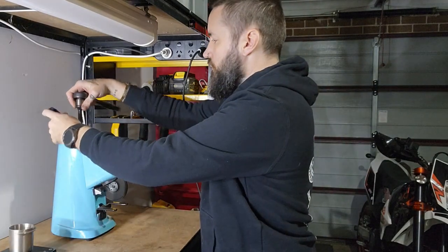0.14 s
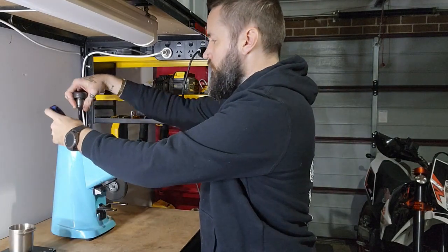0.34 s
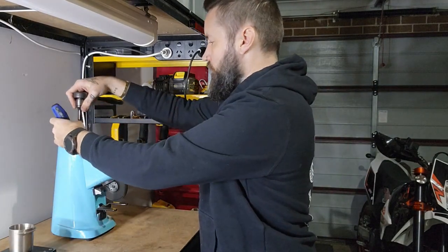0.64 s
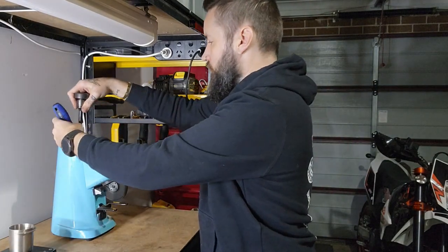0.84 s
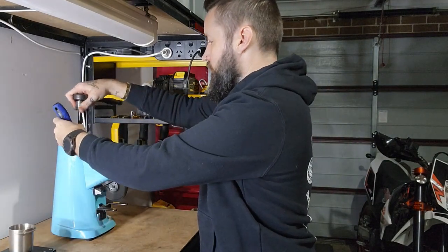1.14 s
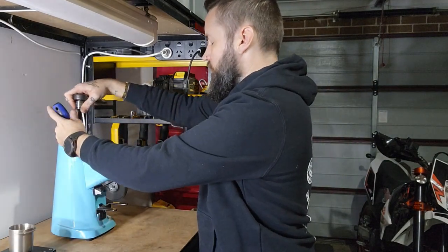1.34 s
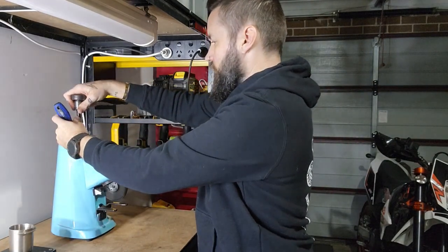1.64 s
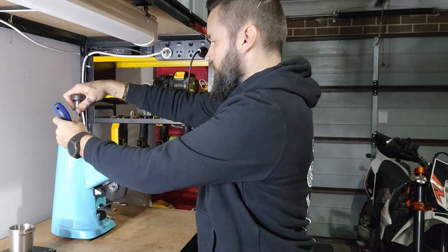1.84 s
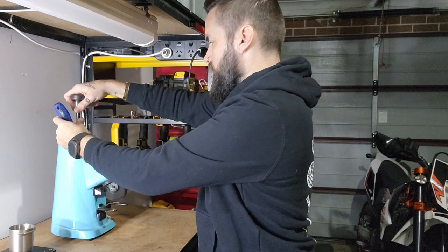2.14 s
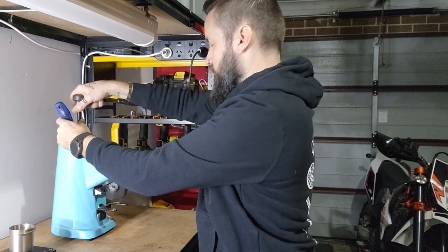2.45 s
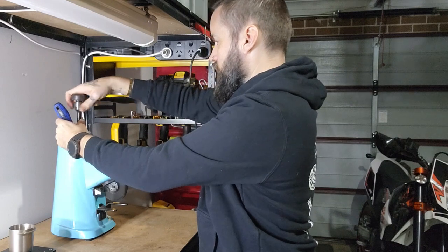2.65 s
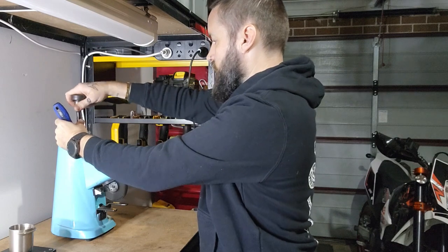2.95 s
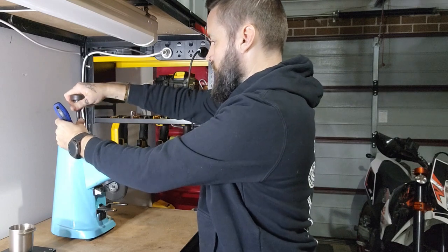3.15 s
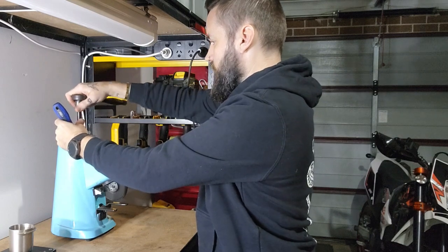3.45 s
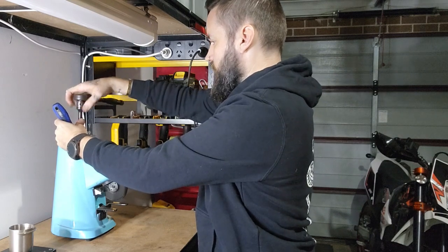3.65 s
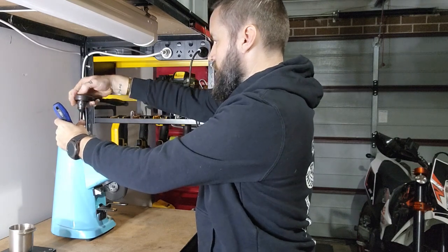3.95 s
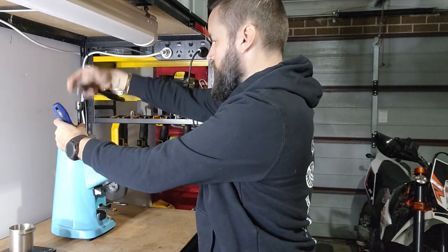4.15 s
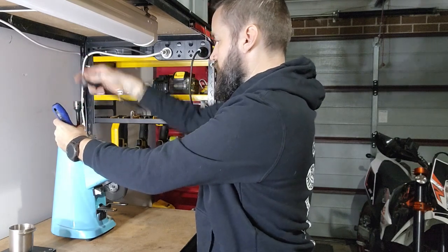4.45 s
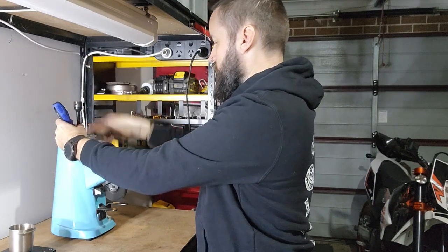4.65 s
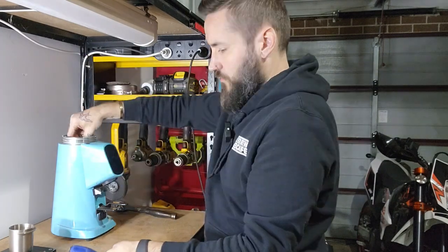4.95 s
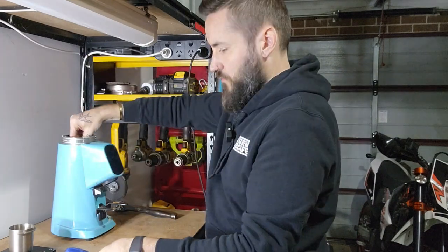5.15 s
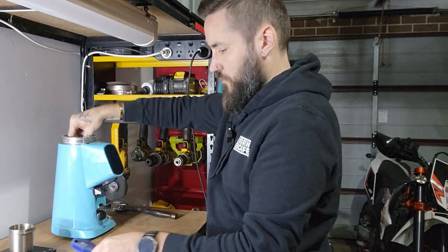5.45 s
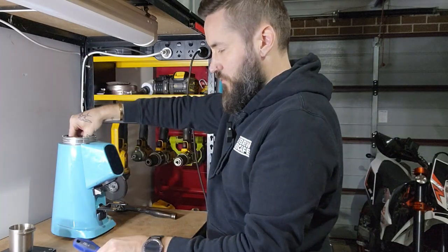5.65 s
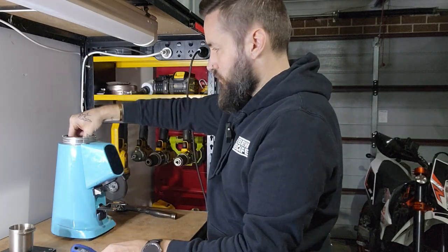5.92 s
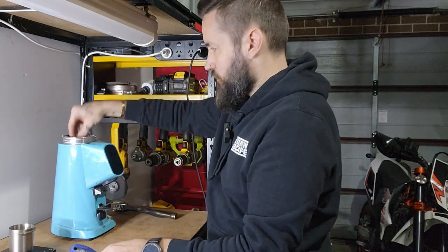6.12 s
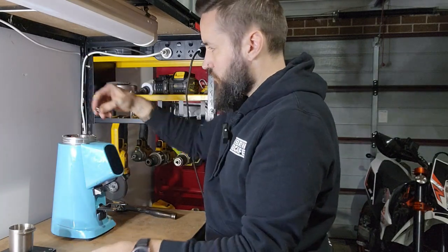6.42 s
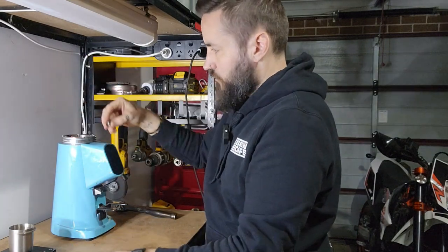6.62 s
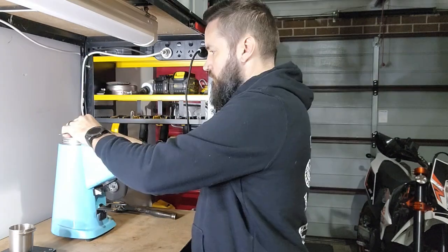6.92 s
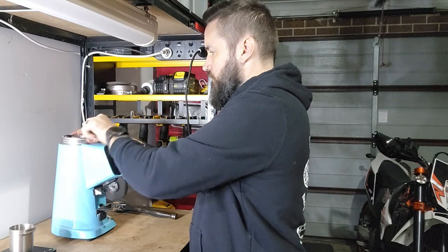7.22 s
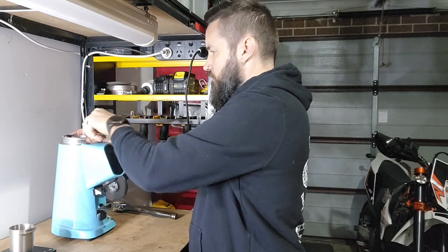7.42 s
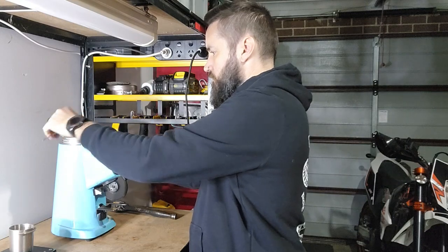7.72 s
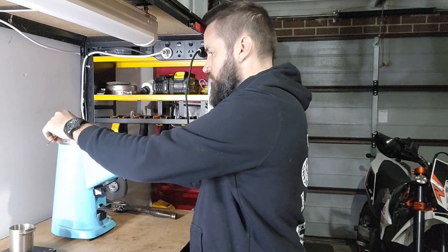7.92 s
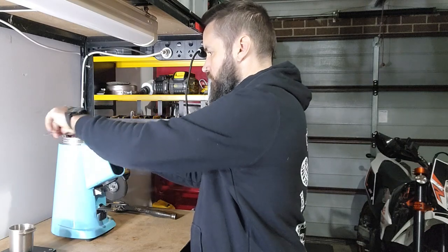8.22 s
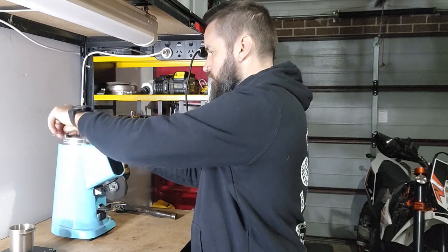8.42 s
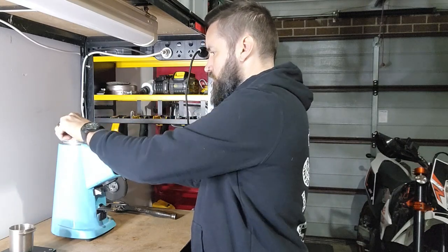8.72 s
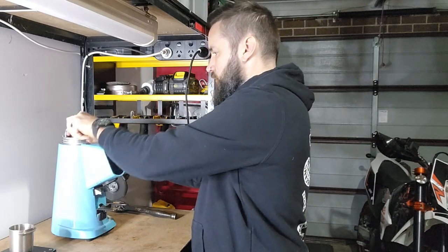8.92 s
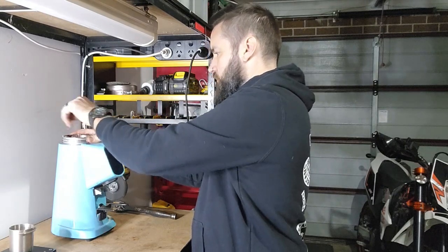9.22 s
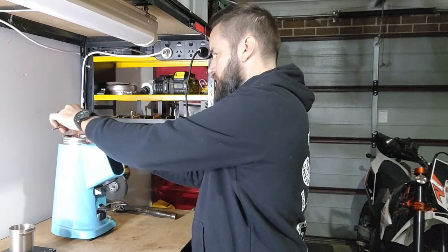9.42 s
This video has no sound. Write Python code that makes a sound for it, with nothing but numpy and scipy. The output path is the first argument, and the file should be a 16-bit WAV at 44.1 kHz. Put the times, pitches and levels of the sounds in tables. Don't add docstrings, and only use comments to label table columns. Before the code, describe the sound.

In a garage, a hand ratchet ticks and knocks on a hollow metal grinder, snaps a few hard clicks, pauses, then rattles off two fast bursts. The socket wobbles loose with faint ticks. A heavy part thuds twice, and a loose metal carrier snaps and clacks at uneven intervals. Sleeves and hands rub softly. Close microphone, short hard-walled room echo.

```python
import sys
import numpy as np
from scipy import signal
from scipy.fft import rfft, irfft, next_fast_len
from scipy.io import wavfile
from scipy.ndimage import uniform_filter1d, map_coordinates

SR = 44100
rng = np.random.default_rng(int(sys.argv[2]) if len(sys.argv) > 2 else 0)


def transcribe(signal):
    frames = np.atleast_2d(signal).T
    limited = np.clip(frames, -1, 1)
    pcm = np.round(limited * 32767).astype(np.int16)
    wavfile.write(sys.argv[1], SR, pcm)


def decibels_to_gain(level_db):
    exponent = np.asarray(level_db, float) / 20
    return 10 ** exponent


N = 422037

# (time [s], peak [dB], strongest ring [Hz], treble [dB], jolt into the housing [dB])
STROKES = [(0.9199, -2, 3473, -10.5, -13), (0.9607, 1, 2512, -11.5, -31), (0.9743, -2, 3358, -13, -12),
           (0.9963, -0.5, 6300, -14, -10.5), (1.0553, -2.5, 3500, -12.5, -28.5),
           (2.5547, -2.5, 4250, -20.5, -29.5), (2.729, -2.5, 4700, -10, -14.5), (2.796, -2, 4784, -13, -23),
           (2.8416, -1, 3830, -12.5, -20), (2.8935, -2, 4273, -12.5, -21), (2.9446, -1, 3260, -14.5, -13.5),
           (2.964, -1.5, 3300, -18, -34), (2.9736, -1.5, 3260, -16.5, -41.5), (2.9843, -2, 3660, -16, -16),
           (3.011, -3, 4186, -17.5, -35.5), (3.04, -1.5, 4304, -17, -27), (3.0706, -5.5, 3672, -16, -21),
           (3.0833, 0, 3686, -15.5, -39), (3.1152, -1.5, 4250, -16.5, -27),
           (3.437, -5.5, 3447, -13.5, -29.5), (3.4465, 3, 3825, -17.5, -37),
           (3.456, -2.5, 3272, -14, -29.5), (3.476, -2.5, 3290, -15.5, -29), (3.49, 0.5, 3263, -10.5, -22),
           (3.5023, -4, 3334, -11, -32), (3.5271, -3.5, 3322, -13, -24.5),
           (3.5547, -3.5, 3290, -14.5, -27.5), (3.627, -12.5, 3528, -10.5, -19)]
# (time [s], peak [dB], strongest ring [Hz], treble [dB])
TICKS = [(0.0447, -17.5, 2830, -17.5), (0.141, -11, 2880, -19.5), (.2308, -51, 2400, -35),
         (0.308, -31.5, 4630, -38), (0.361, -39.5, 2300, -46), (.797, -19, 4720, -35.5),
         (0.8252, -15.5, 2270, -70.5), (1.4287, -42, 2000, -38), (1.5266, -25.5, 4370, -16.5),
         (1.8513, -36.5, 3290, -51.5), (2.323, -25.5, 2930, -72), (2.3994, -37, 2530, -47),
         (2.548, -38, 4300, -13.5), (.167, -45, 3500, -30), (3.868, -45.5, 2970, -45),
         (1.306, -55, 3020, -37), (0.371, -45, 4430, -27.5), (1.497, -44.5, 3380, -37),
         (1.612, -51, 2300, -28), (1.659, -48.5, 3990, -30), (1.803, -61, 3320, -43.5)]
# (time [s], peak [dB], strongest ring [Hz], treble [dB], knock [dB])
SOCKET = [(3.9025, -22, 3220, -17, -36.5), (4.1087, -34, 4570, -21, -35.5), (4.13, -36, 4360, -33, -22.5),
          (4.1476, -29.5, 2400, -42, -29), (4.282, -42, 3480, -29, -43), (4.2955, -40.5, 3660, -38, -37.5),
          (4.383, -44.5, 3750, -41.5, -62), (4.487, -41, 3150, -30, -25.5),
          (4.5206, -24.5, 2500, -24, -23.5), (4.5603, -25, 4900, -27.5, -27.5),
          (4.593, -37, 2180, -37, -21), (4.6346, -25.5, 2310, -68, -33.5), (4.6435, -29, 2850, -53, -30.5),
          (4.741, -45, 3030, -36, -31.5), (4.9332, -30.5, 2070, -20, -29.5),
          (4.9972, -29.5, 4440, -9, -57.5), (5.046, -34, 2180, -2, -46.5)]
# (time [s], peak [dB], strongest ring [Hz], treble [dB], ring [dB])
SNAPS = [(5.23, -42, 2250, -0.5, -28), (5.271, -41, 2960, -19, -19), (5.358, -48, 2400, 0, -17),
         (5.3855, -43, 2200, 2, -11), (5.438, -27, 1293, -32, 11), (5.4408, -35, 2000, -25, 15),
         (5.4984, -39.5, 2050, -7, -12), (5.841, -21.5, 1800, -21.5, -10.5), (6.667, -14.5, 1068, -40.5, 3),
         (6.6674, -2, 4130, -13.5, -2.5), (7.047, 0, 5110, -25, 0), (7.4747, -36, 6700, -14.5, -1.5),
         (7.88, -45.5, 3530, -26.5, 0), (7.962, -26, 4030, -5.5, 10), (7.9706, -22, 3660, -11, 3.5),
         (8.2647, -21.5, 3220, -32, -3), (8.709, -5, 3975, -13, 7.5), (8.8324, 0.5, 3880, -23.5, 4),
         (9.5603, -21, 3820, -2, 7)]
# (pitch [Hz], width [Hz], level [dB])
PAWL = [(2366, 92, 0), (3260, 110, 0.5), (3617, 94, -5), (4180, 70, -2.5), (4720, 130, -6.5),
        (4960, 33, -11), (6430, 47, -15.5), (9180, 230, -7), (11730, 270, -11)]
SEAT = [(2500, 67, -16.5), (2970, 280, -24.5), (3880, 520, -20.5), (4630, 45, -20), (6300, 410, -4.5),
        (6860, 90, -8.5), (11600, 600, -9)]
# (frequency [Hz], level [dB per Hz])
PAWL_CRACK = [(410, -29), (700, -10.5), (1770, -7), (3380, -1.5), (6540, -4), (7460, -12.5), (11200, -19.5),
              (15200, -32), (16500, -39)]
SEAT_CRACK = [(290, -38.5), (500, -8), (1980, -3), (4290, 0.5), (7900, -9.5), (9300, -24.5), (11800, -18.5),
              (15100, -31), (16500, -38.5)]
# (pitch [Hz], level [dB], time to fall 60 dB [s])
FREE_HANDLE = [(2400, -1.5, 0.22), (3400, 12.5, 0.24), (3180, 4.5, 0.22), (5300, -4, .2), (6300, 1.5, 0.18),
               (7060, -3, .25), (8700, -4.5, .2)]
HANDLE = [(2480, -7.5, 0.12), (3290, 11, 0.085), (3660, -1, 0.17), (4250, -5, 0.06), (6600, -6, 0.081)]
HEAD = [(2950, 2.5, 0.18), (4570, 3.5, 0.11), (5100, -1.5, .15), (7360, -3, 0.077), (9000, -6.5, 0.074)]
BURR = [(4090, -0.5, 0.4), (4470, -11.5, 0.22), (3800, -3.5, .2), (3448, -8.5, 0.16), (6600, -8.5, 0.48),
        (7300, -7, .2), (11500, -10, 0.19), (12300, -9, 0.27)]
# (time [s], shell [dB], collar [dB])
KNOCKS = [(.047, 2.5, -7), (0.145, -10, -18), (0.276, -40, -54), (0.3, -19, -51), (.311, -13, -53),
          (.319, -8.5, -26), (0.335, -29, -25), (.421, -44, -49), (.605, -25, -41), (.611, -14.5, -35),
          (.621, -14, -36), (.63, -20.5, -37.5), (.684, -24, -36.5), (.745, -22.5, -44.5),
          (0.756, -25.5, -45), (.79, -14, -40.5), (.812, -17.5, -35.5), (0.667, -24, -34),
          (.733, -28.5, -46), (.784, -16, -34), (.798, -11, -26), (0.83, -12, -23), (.842, -24.5, -29),
          (1.312, -32.5, -40), (1.461, -32, -35.5), (1.499, -16, -47), (1.525, -27, -20.5),
          (1.612, -27.5, -38), (1.85, -37, -36.5), (2.326, -2, -11.5), (2.522, -29.5, -37.5),
          (3.339, -25, -35), (3.66, -29, -54), (0.976, -11.5, -11.5), (2.799, -30.5, -7),
          (4.486, -46.5, -30.5), (4.593, -44, -22), (.235, -43, -47), (.284, -24, -38),
          (.545, -43.5, -60.5), (1.802, -46, -42), (4.268, -39.5, -55), (4.285, -40, -44),
          (4.315, -34, -41), (4.441, -41.5, -50), (4.779, -36, -63), (4.912, -44, -45), (5.104, -55.5, -45),
          (5.164, -45, -37.5)]
# (time [s], shell [dB], bench [dB], collar [dB])
ROCKS = [
    (1.505, -31, -21, -46),
    (3.34, -37.5, -25.5, -39.5),
    (3.635, -27, -22, -39),
    (3.673, -40, -33.5, -44),
    (4.111, -43, -28, -48),
]
# (time [s], shell [dB], bench [dB], chamber [dB])
OPEN_KNOCKS = [(5.229, 5, -10, -3), (5.842, -1.5, -16.5, -14), (5.438, -21.5, -45.5, -40),
               (5.492, -25.5, -32.5, -25.5), (6.625, -65.5, -38.5, -51.5), (6.665, -31.5, -20.5, -20.5),
               (7.045, -36, -11.5, -11.5), (7.411, -49.5, -37, -36.5), (7.474, -43, -32.5, -38.5),
               (7.733, -43.5, -51.5, -72.5), (7.887, -44, -45, -66), (7.94, -34, -53, -62.5),
               (7.965, -26, -35.5, -34), (8.214, -34, -49.5, -60), (8.264, -27.5, -30.5, -54.5),
               (8.506, -17.5, -58, -39.5), (8.551, -50.5, -30, -44.5), (8.607, -22, -61, -60),
               (8.709, -47.5, -26.5, -22.5), (8.81, -20, -49, -49.5), (8.832, -40, -18.5, -13.5),
               (9.09, -25.5, -36.5, -45.5), (5.238, -7.5, -28.5, -4.5), (5.248, 2.5, -30, -20.5),
               (5.258, -11.5, -26.5, -26.5), (5.281, -12, -29, -26), (5.505, -49.5, -45.5, -32),
               (5.522, -49.5, -54.5, -40.5), (5.592, -38, -55, -41), (5.612, -35, -48.5, -40.5),
               (5.69, -41.5, -52.5, -46), (5.763, -47.5, -50.5, -39), (5.797, -33.5, -45.5, -36.5),
               (5.858, -6.5, -20, -15)]
# (pitch [Hz], width [Hz], level [dB])
SHELL = [(573, 37, 7), (526, 120, -8), (652, 9.3, 0)]
BENCH = [(100, 15, -11), (161, 34, 8), (330, 120, 0.5), (403, 5.7, -6)]
COLLAR = [(1183, 83, 4.5), (1390, 22, -13)]
OPEN_SHELL = [(530, 26, 5.5), (710, 150, -21.5)]
OPEN_BENCH = [(126, 21, 3), (153.6, 6.2, 10), (238, 98, -4)]
CHAMBER = [(391.7, 14, 3.5), (287, 30, -4.5)]
# (time [s], peak [dB], time to fall 60 dB [s])
THUDS = [
    (5.228, 0, 0.044),
    (5.839, -1.5, 0.19),
]
# (time [s], peak [dB], time to fall 60 dB [s])
TAP = [
    (6.349, -26, 0.028),
]
# (frequency [Hz], level [dB per Hz])
LANDING = [(35, -52), (60, -19.5), (260, -6.5), (404, -6.5), (520, -2.5), (683, -13), (955, -11.5),
           (1450, -22), (2200, -35), (9000, -60.5), (11700, -83), (19800, -120)]
FINGER = [(60, -30), (200, 3), (900, 0.5), (2000, -12.5), (2700, -22), (15000, -49)]
# (start [s], end [s], pitch [Hz], width [Hz],
# level [dB])
SCRAPES = [(7.22, 7.46, 153, 410, -48), (4.109, 4.174, 1214, 62, -40), (4.107, 4.169, 1540, 3000, -42.5),
           (4.503, 4.543, 840, 2000, -39.5), (4.48, 4.66, 860, 690, -50.5), (.64, .85, 330, 130, -40.5),
           (4.627, 4.654, 1100, 2600, -43), (5.417, 5.525, 1200, 1300, -46.5),
           (4.93, 4.965, 1248, 110, -43.5), (5.043, 5.075, 1290, 59, -44.5), (5.1, 5.2, 1200, 170, -59.5),
           (5.082, 5.197, 2200, 330, -55.5), (6.378, 6.528, 110, 410, -57.5),
           (5.75, 5.838, 780, 400, -55.5), (5.47, 5.54, 340, 300, -36.5), (5.56, 5.63, 465, 610, -47),
           (5.68, 5.838, 240, 550, -44.5), (4.48, 4.505, 3500, 170, -59), (4.26, 4.33, 560, 180, -47.5),
           (.07, .13, 4600, 250, -56), (.29, .34, 4620, 300, -54), (.44, .54, 4550, 280, -64),
           (.62, .71, 4600, 260, -64), (.77, .79, 4550, 250, -57), (.15, .22, 7450, 250, -61),
           (.3, .4, 7450, 260, -66), (.61, .67, 7450, 260, -65), (.42, .51, 600, 150, -45),
           (.31, .44, 1170, 90, -45), (.61, .72, 540, 250, -44), (3.63, 3.7, 1150, 300, -45),
           (3.64, 3.71, 3000, 900, -51)]
# (time [s], effort [dB])
HANDS = [(0, -40), (.59, -59.5), (.88, -49), (1.17, -55), (2.16, -68.5), (2.96, -46), (3.221, -61),
         (3.57, -53), (3.92, -62.5), (5.22, -55.5), (5.4, -43.5), (5.639, -59), (5.818, -38.5),
         (6.16, -75.5), (7.202, -54), (7.65, -87.5), (8.87, -45), (9.17, -60.5)]
# (frequency [Hz], level [dB per Hz])
RUMBLE = [(18, -63), (30, -23.5), (45, -22), (65, 5), (108, -14.5), (160, -3), (450, -34.5), (580, -63.5),
          (990, -120)]
RUSTLE = [(820, -30), (1400, -7), (1990, -6.5), (4050, -8.5), (10100, -19), (15200, -47), (16000, -29.5),
          (16500, -51)]
# (start [s], end [s], pitch [Hz], width [Hz], level [dB])
SLEEVES = [(0.26, 0.36, 5600, 9000, -55), (0.578, 0.75, 4630, 8640, -53), (1.42, 1.7, 2500, 5556, -49.5),
           (3.76, 3.82, 9300, 6040, -58), (8.47, 8.66, 5980, 9000, -61.5), (5.62, 5.84, 5000, 8000, -57),
           (3.28, 3.43, 3700, 7025, -65), (4.088, 4.216, 2500, 4000, -54.5),
           (4.463, 4.7, 2500, 4000, -52.5), (4.905, 5.065, 2500, 4000, -59), (5.297, 5.56, 9000, 6900, -74)]
# (frequency [Hz], time to fall 60 dB [s])
GARAGE = [(100, 0.63), (500, 0.33), (2000, .43), (5000, 0.34), (8000, 0.27), (13000, 0.2), (16000, .15)]
# (frequency [Hz], level [dB per Hz])
AIR = [(15, -36.5), (25, -8), (80, -1.5), (433, -16), (553, -15), (1980, -26), (3510, -22.5), (6730, -26.5),
       (8140, -41.5), (15200, -43.5), (16500, -54)]


def unit(x):
    return x / np.sqrt(np.mean(x ** 2) + 1e-20)


def along(points, hz):
    f, v = np.transpose(points)
    return np.interp(np.log(hz + 1), np.log(f + 1), v)


def filtered(x, response):
    size = next_fast_len(len(x) + min(len(x) // 2, 8192))
    hz = np.fft.rfftfreq(size, 1 / SR)
    return irfft(rfft(x, size) * response(hz), size)[:len(x)]


def resonant(modes):
    def response(f):
        return sum((-1) ** k * decibels_to_gain(db) * 1j * f * w / (c * c - f * f + 1j * f * w)
                   for k, (c, w, db) in enumerate(modes))
    return response


def coloured(spectrum, size):
    return unit(filtered(rng.standard_normal(size), lambda hz: decibels_to_gain(along(spectrum, hz))))


def even(x):
    z = rfft(x, 2 * len(x))
    power = uniform_filter1d(np.abs(z) ** 2, size=80)
    return irfft(z / np.sqrt(np.abs(power) + 1e-12))[:len(x)]


def even_burst(raw, spectrum):
    return unit(filtered(even(raw), lambda hz: decibels_to_gain(along(spectrum, hz)))) * raw.std()


def lumpy_run(size, hz, width, lumps_db, hold):
    lumps = np.repeat(rng.standard_normal(size // hold + 1), hold)[:size]
    slips = rng.standard_normal(size) * decibels_to_gain(lumps_db * lumps)
    return unit(filtered(slips, lambda f: resonant([(hz, width, 0)])(f) ** 2))


def add(track, s, x):
    part = track[round(s * SR):][:len(x)]
    part += x[:len(part)]


def ratchet_contacts():
    loaded = [(s, db, hz, treble_db, -1) for s, db, hz, treble_db, _ in STROKES]
    slack = [(*row, -1) for row in TICKS]
    wobble = [(s, db, hz, treble_db, 1) for s, db, hz, treble_db, _ in SOCKET]
    return loaded, slack + wobble


def clicks(rows, crack, modes, ring_db, spike_db, t60, shared):
    track, spread = np.zeros(N), np.zeros(N)
    t = np.arange(SR // 16) / SR
    for s, db, own_hz, treble_db, own_db in rows:
        def tilt(hz):
            return decibels_to_gain(along([(6000, 0.0025), (9500, treble_db + 23.0)], hz))

        fade = decibels_to_gain(-60 * t / t60)
        raw = rng.standard_normal(len(t)) * (fade + decibels_to_gain(spike_db - 60 * t / 0.0017))
        burst = filtered(even_burst(raw, crack), tilt)
        ring = np.zeros(len(t))
        for c, w, g in modes:
            level = decibels_to_gain(g + rng.normal(0, 1.0) + ring_db) * tilt(c)
            ring += level * np.exp(-np.pi * w * t) * np.sin(2 * np.pi * c * t + rng.uniform(0, 2 * np.pi))
        drift = np.cumsum(rng.normal(0, .09, len(t)))
        own = decibels_to_gain(own_db) * fade ** 0.66 * np.sin(2 * np.pi * own_hz * t + drift)
        x = (burst + ring + own) * (1 - np.exp(-t / 0.000093))
        x *= decibels_to_gain(db) / np.abs(x).max()
        add(track, s, x)

        def hump(hz):
            own_peak = 0.26 * decibels_to_gain(own_db) / (1 + ((hz - own_hz) / 260) ** 2)
            peaks = 1 + shared * np.abs(resonant(modes)(hz)) + own_peak
            return decibels_to_gain(along(crack, hz)) * tilt(hz) * peaks

        impulse = 1. * (np.arange(len(t)) == SR // 500)
        blow = filtered(impulse, hump)
        add(spread, s, blow * np.linalg.norm(x) / np.linalg.norm(blow))
    return track, spread


def ringing(rows, modes, under_db):
    track, t = np.zeros(N), np.arange(SR // 3) / SR
    top_db = max(g for _, g, _ in modes)
    for s, db, own_hz, *_ in rows:
        struck = (own_hz, top_db - 5.5, 0.087)
        hz, level_db, t60 = np.transpose(modes + [struck])[:, :, None]
        luck, phase = rng.normal(0, 3, hz.shape), rng.uniform(0, 2 * np.pi, hz.shape)
        wander = .14 * (hz / 4000) ** .6
        smear = np.cumsum(wander * rng.standard_normal((len(hz), len(t))), axis=1)
        grip = rng.normal(1, .008)
        level = decibels_to_gain(db + under_db + level_db - top_db + luck - 60 * t / t60)
        partials = level * np.sin(2 * np.pi * hz * grip * t + phase + smear)
        add(track, s, np.sum(partials, axis=0))
    return track


def steel_rings():
    loose = 5
    strong_snaps = [row for row in SNAPS if row[1] > -10 or row[4] > 4]
    return (ringing(STROKES[:loose], FREE_HANDLE, -27) + ringing(STROKES[loose:], HANDLE, -21.5)
            + ringing(strong_snaps, BURR, -28) + ringing(TICKS, HEAD, -20.5))


def loaded_knocks():
    listed = [(s, db, -17.5 + 0.84 * db, collar_db) for s, db, collar_db in KNOCKS]
    by_pawl = [(s + 0.0066, db, db - 12, db - 2.5) for s, *_, db in STROKES]
    by_socket = [(s, db, db - 15.5, db - 12.5) for s, *_, db in SOCKET]
    return listed + by_pawl + by_socket + ROCKS


def housing(rows, bodies, gains_db):
    s, *levels = np.transpose(rows)
    t = np.arange(SR // 4) / SR
    looseness = np.clip(-levels[0] / 14 - .3, 0, 1)
    scuff = np.sqrt(t / .004) * np.exp(-t / .009)
    chatter = looseness[:, None] * rng.standard_normal((len(s), len(t))) * scuff
    shifts = 1 + 0.023 * looseness[:, None] * rng.uniform(-0.018, 1, (len(s), len(bodies)))
    lags, contacts = (-.0015, .003, 0.), (.00035, .0005, .0002)
    touch = (1, 1, 0)
    out = np.zeros(N)
    for db, modes, lag, contact, gain_db, shift, held in zip(
            levels, bodies, lags, contacts, gains_db, shifts.T, touch):
        soft = np.exp(-((t - 2.08 * contact) / contact) ** 2) * 0.00018 / contact
        for when, level, rough, by, loose in zip(s, db, chatter, shift, looseness):
            wider = 1 + 1.7 * loose * held
            touched = [(c * by ** held, w * wider, g) for c, w, g in modes]
            answer = filtered(soft + .13 * rough, resonant(touched))
            add(out, when + lag, decibels_to_gain(level + gain_db) / np.sqrt(wider) * answer)
    return out


def landing(rows, spectrum):
    track, t = np.zeros(N), np.arange(SR // 2) / SR
    for s, db, t60 in rows:
        raw = rng.standard_normal(len(t)) * decibels_to_gain(-60 * t / t60)
        add(track, s, decibels_to_gain(db - 3.5) * (1 - np.exp(-t / 0.00061)) * even_burst(raw, spectrum))
    return track


def scrapes():
    track = np.zeros(N)
    for start, end, hz, width, db in SCRAPES:
        size = round((end - start) * SR)
        slips = lumpy_run(size, hz, width, lumps_db=5, hold=200)
        add(track, start, decibels_to_gain(db) * np.hanning(size) ** 0.023 * slips)
    return track


def hands():
    rub_db = np.interp(np.arange(N) / SR, *np.transpose(HANDS))
    swing_db = rub_db + 53
    rumble_db, rustle_db = -52 + 0.86 * swing_db, -58.5 + 0.84 * swing_db

    def lumps(rate):
        return map_coordinates(rng.standard_normal(int(N * rate / SR) + 4), [np.arange(N) * rate / SR])

    slips = rng.standard_normal(N) * decibels_to_gain(4 * lumps(40))
    held = np.interp(np.arange(N) / SR, [5.1, 5.25], [1, .35])
    housing_rub = held * unit(filtered(slips, resonant(SHELL + COLLAR)))
    skin = coloured([(200, -26.0), (330, -3.0), (800, -9.0), (1500, -16.5), (2400, -44.5)], N)
    rub = unit(housing_rub + 3.3 * skin)
    rustle = unit(coloured(RUSTLE, N) * decibels_to_gain(2.5 * lumps(60)))
    rumble = unit(coloured(RUMBLE, N) * decibels_to_gain(3.5 * lumps(15)))
    return decibels_to_gain(rumble_db) * rumble + decibels_to_gain(rub_db) * rub + decibels_to_gain(rustle_db) * rustle


def sleeves():
    track = np.zeros(N)
    for start, end, hz, width, db in SLEEVES:
        size = round((end - start) * SR)
        cloth = lumpy_run(size, hz, width, lumps_db=2, hold=300)
        add(track, start, decibels_to_gain(db) * np.hanning(size) * cloth)
    return track


def garage(x):
    out, step = np.zeros(N), SR // 5
    for k in range(0, N, step):
        hz, t, z = signal.stft(rng.standard_normal(SR * 3 // 5), SR, nperseg=256)
        fade = decibels_to_gain(-60 * t / along(GARAGE, hz)[:, None])
        tail = signal.istft(z * fade, SR, nperseg=256)[1]
        echo = signal.fftconvolve(x[k:k + step], tail / np.linalg.norm(tail))
        add(out, k / SR + 0.0028, echo)
    return out


def scene():
    loaded_clicks, slack_ticks = ratchet_contacts()
    pawl, pawl_blows = clicks(loaded_clicks, PAWL_CRACK, PAWL,
                              ring_db=-7.5, spike_db=5.5, t60=0.03, shared=0.77)
    tick, tick_blows = clicks(slack_ticks, PAWL_CRACK, PAWL,
                              ring_db=-5.5, spike_db=6.0, t60=0.034, shared=0.6)
    seat, seat_blows = clicks(SNAPS, SEAT_CRACK, SEAT,
                              ring_db=-17, spike_db=7, t60=0.035, shared=0.47)
    rings = steel_rings()
    loaded = housing(loaded_knocks(), (SHELL, BENCH, COLLAR), gains_db=(16, 16, 16))
    opened = housing(OPEN_KNOCKS, (OPEN_SHELL, OPEN_BENCH, CHAMBER), gains_db=(13, 21, 21))
    drop, drag = landing(THUDS, LANDING), scrapes()

    ratchet = pawl_blows + .4 * pawl + .5 * (tick_blows + .4 * tick)
    steel = decibels_to_gain(-12) * ratchet + decibels_to_gain(-8) * (seat_blows + .25 * seat)
    damped = decibels_to_gain(-8) * opened
    collar_dip = [(800, -0.5), (1100, -6.5)]
    loaded_feed = filtered(decibels_to_gain(-3.5) * loaded, lambda hz: decibels_to_gain(along(collar_dip, hz)))
    wet = garage(steel + loaded_feed + damped + decibels_to_gain(-7.0) * drop + decibels_to_gain(-12.5) * drag)

    direct = decibels_to_gain(2.0) * (pawl + tick + seat) + rings + loaded + opened + drop + drag
    soft = landing(TAP, FINGER) + hands() + sleeves()
    return (direct + soft + wet + decibels_to_gain(-60.0) * coloured(AIR, N))[None]


def band_limit(x):
    return signal.sosfilt(signal.butter(12, 16990, fs=SR, output="sos"), x)


def record(dry):
    thin = signal.sosfilt(signal.butter(4, 58, "high", fs=SR, output="sos"), dry[0])
    rounded = thin / (1 + np.abs(thin) ** 8) ** (1 / 8)
    band = [(25, -12.5), (50, 0.0), (15700, -0.5), (16600, -26.5), (17500, -94.5)]  # (Hz, dB)
    flat = filtered(rounded, lambda hz: decibels_to_gain(along(band, hz)))
    return band_limit(np.clip(flat, -1, 1)[None])


dry = scene()
out = record(dry)
transcribe(out)
```